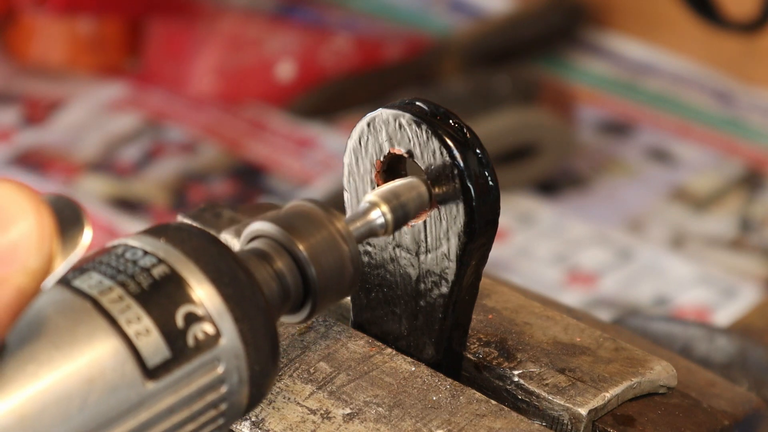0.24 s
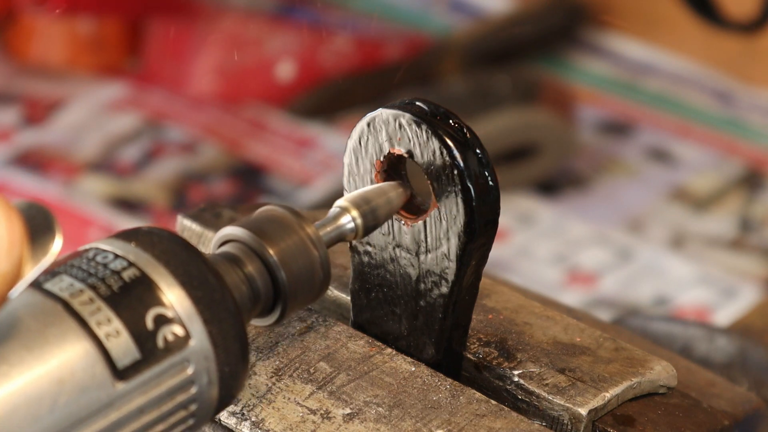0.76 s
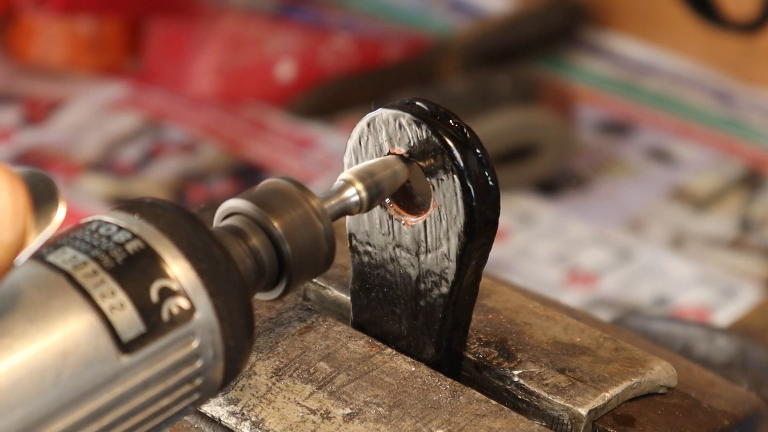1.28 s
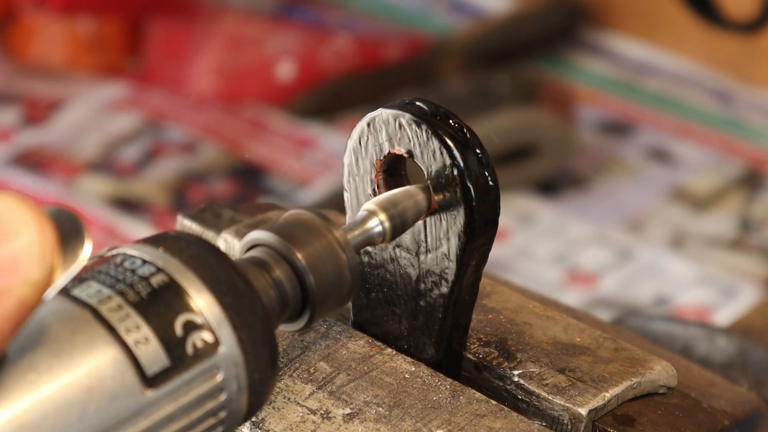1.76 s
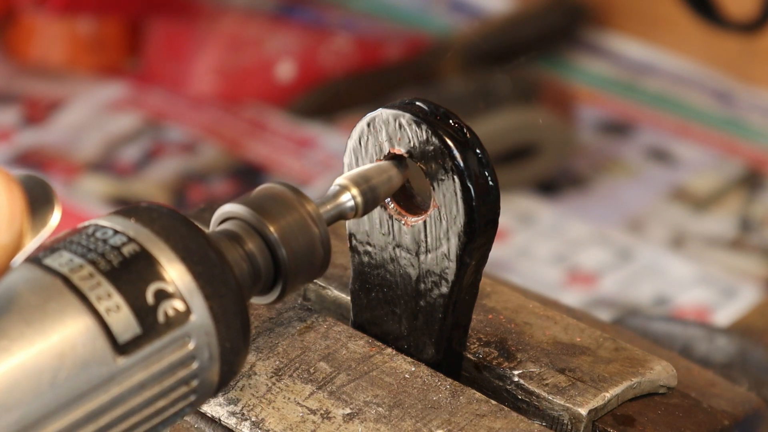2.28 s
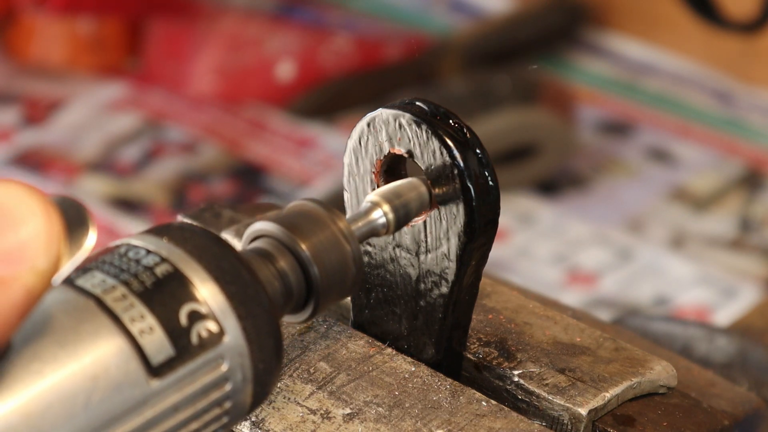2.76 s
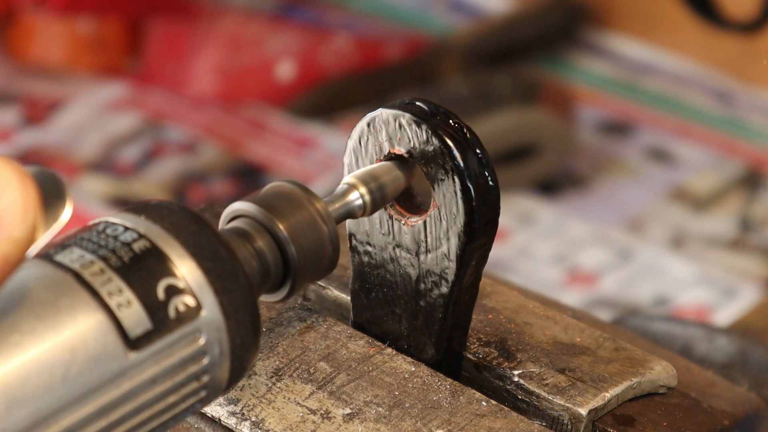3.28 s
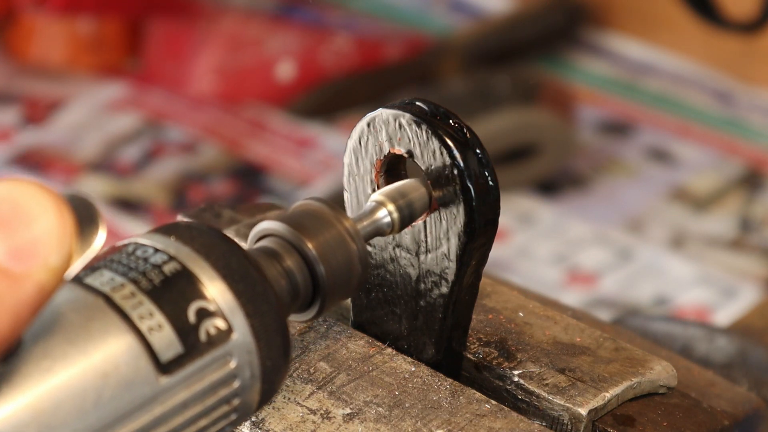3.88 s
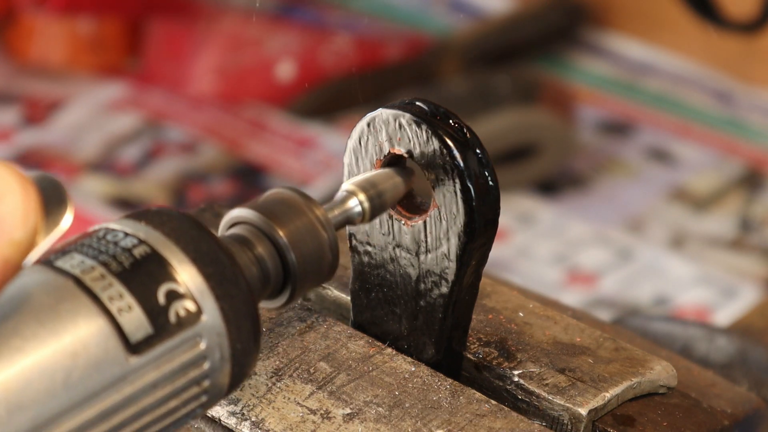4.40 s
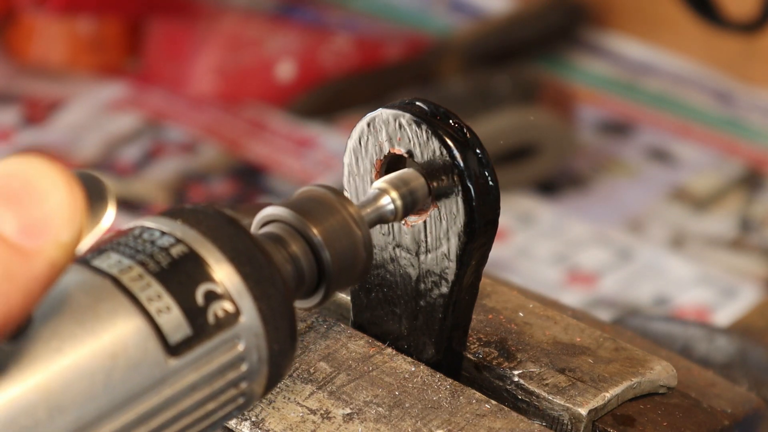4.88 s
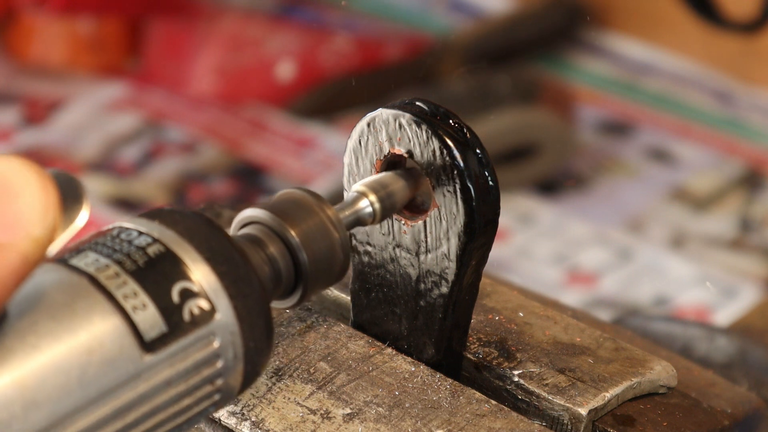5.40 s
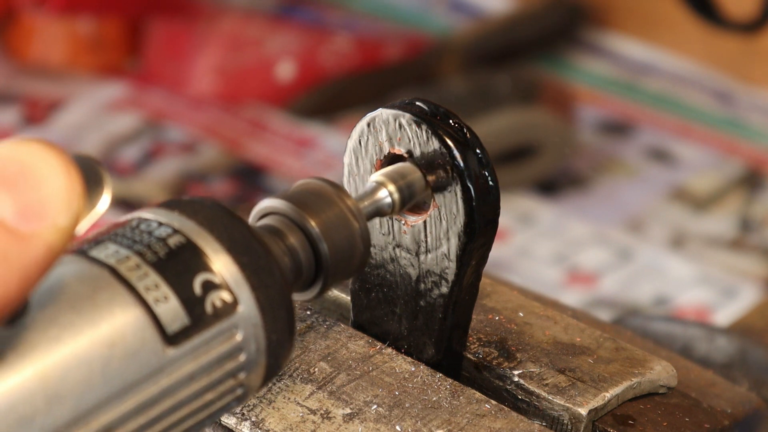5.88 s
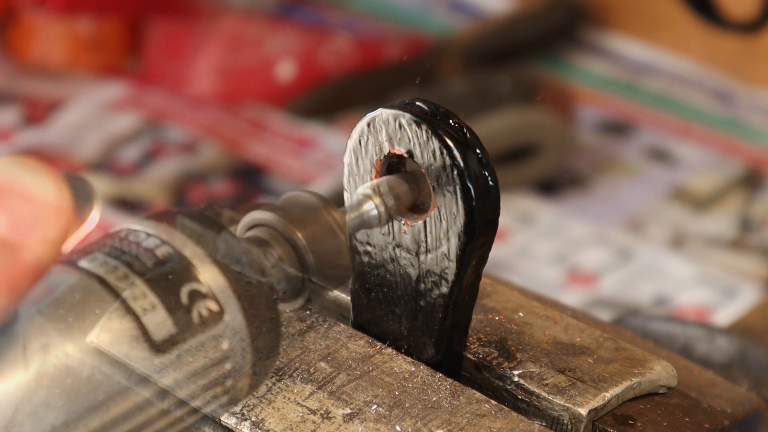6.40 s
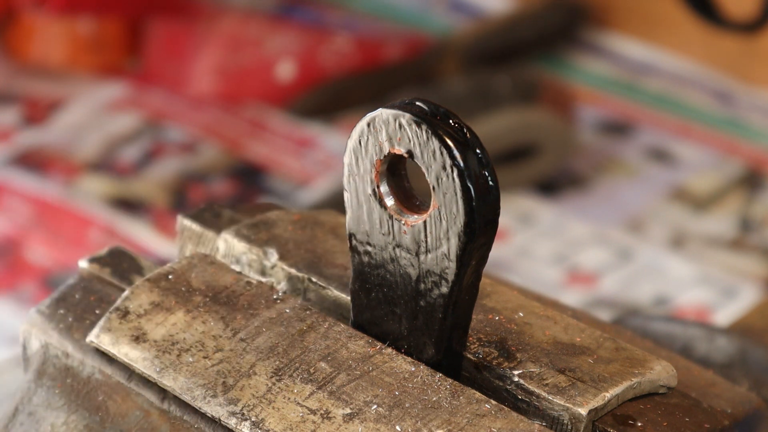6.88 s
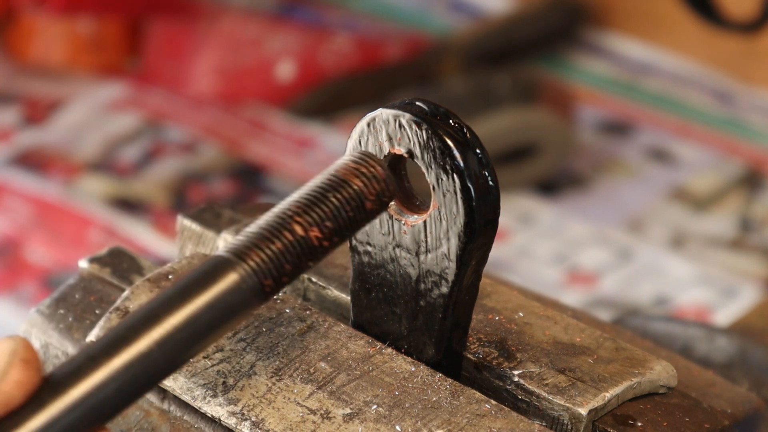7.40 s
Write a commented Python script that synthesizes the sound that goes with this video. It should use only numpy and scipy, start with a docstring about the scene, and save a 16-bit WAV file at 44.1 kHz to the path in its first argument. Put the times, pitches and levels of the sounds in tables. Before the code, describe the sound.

An electric die grinder whines and rasps inside a steel hole, pitch sagging under load and racing up, then fades to faint room noise.

```python
"""Small workshop, close by: an electric die grinder widens a hole in a steel part held in a vice.
The motor whine (gliding sines) sinks under the bite and races when eased, dipping in reflection nulls.
Shaft-locked sines buzz, knock and whistle; noise bunched by the rotation scrapes, rings, rasps and hisses.
Loud revs are turned down by a gain control. The sound fades, slows and drops in pitch at the end, and is
cut off quickly to faint room noise."""
import sys
import numpy as np
from scipy import signal
from scipy.fft import rfft, irfft, next_fast_len
from scipy.io import wavfile
from scipy.ndimage import uniform_filter1d

SR = 44100
rng = np.random.default_rng(int(sys.argv[2]) if len(sys.argv) > 2 else 0)


def log_audio(samples):
    """Write samples as a 16-bit WAV file to the path given in sys.argv[1]."""
    # one column per channel
    frames = np.atleast_2d(samples).T
    # limit to full scale, then quantise
    limited = np.clip(frames, -1, 1)
    pcm = np.round(limited * 32767).astype(np.int16)
    wavfile.write(sys.argv[1], SR, pcm)


N = 337365
TIME = np.arange(N) / SR
BEATS_PER_TURN = 4  # whine cycles per shaft turn
REFERENCE_HZ = 500


def undb(db):
    """Decibels to gain."""
    return 10 ** (np.asarray(db) / 20)


def unit(x):
    """Scale to rms 1."""
    return x / np.sqrt(np.mean(x ** 2))


def curves(table):
    """Interpolate each column after t/s to one value per sample."""
    t_s, *columns = np.transpose(table)
    return [np.interp(TIME, t_s, column) for column in columns]


def colour(x, points):
    """Filter by a spectrum of f/Hz, level/dB points with both ends rolled off; rms 1."""
    f_points, db_points = np.transpose(points)
    size = next_fast_len(N)
    f = np.maximum(np.fft.rfftfreq(size, 1 / SR), 1)
    ends = np.minimum(f / f_points[0], 1) ** 2 * np.minimum(f_points[-1] / f, 1) ** 4
    gain = undb(np.interp(np.log(f), np.log(f_points), db_points))
    return unit(irfft(rfft(x, size) * ends * gain, size)[:N])


def resonate(x, modes):
    """Sum parallel resonances, each filtered twice for steep skirts; rms 1."""
    out = 0
    for f_hz, width_hz, db in modes:
        b, a = signal.iirpeak(f_hz, f_hz / width_hz, fs=SR)
        once = signal.lfilter(b, a, x)
        out = out + undb(db) * signal.lfilter(b, a, once)
    return unit(out)


def walk(rate_hz):
    """Random curve, linear between rate_hz new values a second; rms 1."""
    knots = rng.standard_normal(8192)
    return unit(np.interp(TIME * rate_hz, np.arange(len(knots)), knots))


def sine(phase):
    """Sine of rms 1 from a phase in cycles, with a random start."""
    return np.sqrt(2) * np.sin(2 * np.pi * (phase + rng.random()))


def octaves(hz):
    """Motor speed above the reference, in octaves."""
    return np.log2(hz / REFERENCE_HZ)


# motor speed as whine pitch, before smoothing: t/s, f/Hz
SPEED_CURVE = [(0.01, 512.2), (0.46, 491.7), (0.59, 521), (0.82, 548.5), (0.95, 552.8), (1.09, 545),
               (1.27, 511.7), (1.49, 496), (1.85, 516.3), (1.92, 547), (1.99, 611), (2.03, 627),
               (2.19, 606.6), (2.33, 526), (2.55, 481), (2.74, 481.7), (2.87, 499), (3.0, 622), (3.14, 706),
               (3.41, 509.5), (3.5, 474.2), (3.89, 487.9), (4.05, 545.5), (4.11, 558), (4.25, 579),
               (4.55, 526), (4.62, 502), (4.74, 483.3), (5.06, 486.5), (5.09, 511.6), (5.22, 711.2),
               (5.32, 745), (5.38, 709), (5.49, 536.5), (5.57, 489), (5.76, 466.3), (6.25, 474.8),
               (6.51, 516.8), (6.7, 478.7), (6.74, 483.6)]
SLOWDOWN_S, SLOWDOWN_TAU_S = 6.75, .098


def speed():
    """Whine pitch/Hz: swings with the hand, wavers, and at the end drops exponentially to 1/e^2."""
    driven = uniform_filter1d(curves(SPEED_CURVE)[0], size=1400)
    driven = driven * (1 + .0018 * walk(40))
    slowing_s = np.clip(TIME - SLOWDOWN_S, 0, 2 * SLOWDOWN_TAU_S)
    return driven * np.exp(-slowing_s / SLOWDOWN_TAU_S)


# clean partials of the whine: multiple of f, level at reference pitch/dB, rise/(dB/octave)
WHINE_PARTIALS = [(1.0, -22.5, 15.5), (2.0, -24.5, 15), (3.0, -29, 3)]
# where nearby reflections cancel the whine: f/Hz, half width/Hz, depth/dB
REFLECTION_NULLS = [(528.6, 17.3, 14.5), (676, 17, 19), (729, 43, 6.5), (935, 8, 5), (966.6, 7.8, 11.5),
                    (1029, 23.3, 10), (1149, 40.4, 13.5), (1262, 20, 14), (1504, 43, 9), (1586, 25, 10.5),
                    (1726, 55, 11), (1880, 18, 14), (2040, 55, 26.5)]
# below the first, partials radiate poorly; below the second, the drive stops weakening
WHINE_LOW_HZ, WHINE_FULL_HZ = 432, 468


def whine(hz, phase, flutter_db, sway_db):
    """Three clean partials grow with speed and dip as they glide through reflection nulls."""
    out = 0
    drive = octaves(np.maximum(hz, WHINE_FULL_HZ))
    for k, db, rise in WHINE_PARTIALS:
        f = k * hz
        dips_db = sum(depth / (1 + ((f - centre) / half_width) ** 2)
                      for centre, half_width, depth in REFLECTION_NULLS)
        passed = uniform_filter1d(undb(-dips_db), size=900)  # a quick glide leaves no time for a deep dip
        level = undb(db + rise * drive + flutter_db * walk(70) + sway_db * walk(12))
        radiation = np.minimum(f / WHINE_LOW_HZ, 1) ** 4
        out = out + passed * level * radiation * sine(k * phase)
    return out


# upper partials before colouring: multiple of whine f, level/dB
BUZZ_PARTIALS = [(4, 7.5), (5, 0), (6, 0), (7, 0.5), (8, -2.5), (9, 0), (10, -2), (11, 0.5), (12, 0),
                 (13, -4.5), (14, 0), (15, -1.5), (17, -4.5)]
# radiation of the housing: f/Hz, level/dB
HOUSING_SPECTRUM = [(900, -22.5), (1850, -5.5), (2020, -19.5), (2200, -12), (2400, -6), (2770, 1.5),
                    (3000, -6.5), (3300, -2.5), (3700, -20)]
# singing of the bit: f/Hz, level/dB
SINGING_SPECTRUM = [(3200, -18), (3750, -8), (4200, -1), (4550, -1), (5000, 3.5), (5300, -1), (5900, 2.5),
                    (6350, -7), (6900, -5), (7600, -13.5), (8600, -20.5), (9500, -16.5), (10400, -25.5),
                    (11200, -4.5), (12200, -18)]
# cut force about its usual level, also used by knock and cutting: t/s, part scrape level/dB, bit ring level/dB
CUT_FORCE = [(0.0, -2.5, 0), (0.27, -6.5, -7.5), (0.67, -3.5, 2), (1.35, -4.5, -3), (1.45, 2, 0.5),
             (1.9, -1.5, 1.5), (2.0, 1.3, 5.5), (2.46, -5.5, 3), (2.55, 2, -1), (2.91, 0.5, -1.3),
             (2.96, -1.4, 6.5), (3.15, 6.5, 6.5), (3.41, -1, 3.5), (3.52, 0.5, 1), (3.83, 3, -1),
             (4.17, -3.5, 2), (4.21, 0.6, 6.5), (4.61, -3.5, 0.8), (4.89, 5.5, 2), (5.04, 2.8, -4),
             (5.15, 5.5, 8), (5.67, 4, 2), (5.8, -3.3, 7), (5.89, 5.5, 0.9), (6.12, 2, -3.5),
             (6.22, -2.6, -9), (6.51, 5, 9), (6.72, 3, -0.5)]


def buzz(hz, phase, shake, flutter_db, wobble, housing_db, singing_db,
         housing_db_per_octave, singing_db_per_octave):
    """Upper partials excite housing and bit, grow with speed and are phase-shaken by scraping."""
    scrape = unit(undb(curves(CUT_FORCE)[0]))
    phase = phase + shake * scrape * walk(260)
    partials = sum(undb(db + flutter_db * walk(14)) * sine(k * phase) for k, db in BUZZ_PARTIALS)
    # slightly untrue bit: side tones one shaft speed away
    partials = partials * (1 + wobble * sine(phase / BEATS_PER_TURN))
    housing_gain = undb(housing_db + housing_db_per_octave * octaves(hz))
    singing_gain = undb(singing_db + singing_db_per_octave * octaves(hz))
    return colour(partials, HOUSING_SPECTRUM) * housing_gain + colour(partials, SINGING_SPECTRUM) * singing_gain


# overtones of the knock: multiple of shaft f, level/dB
SHAFT_OVERTONES = [(2, -7.5), (3, -5), (5, -1.5), (6, -9), (7, 1.5), (9, -17), (10, -15.5), (11, 0.5),
                   (13, -10), (14, -8.5), (15, -6.5), (18, 2.5), (19, 3.5), (21, 7.5), (22, 1.5),
                   (23, -4.5), (25, -3.5)]
BITE_HZ, BITE_WIDTH_HZ = 538, 12  # the bit presses hard when the whine is dragged below BITE_HZ


def knock(hz, phase, light_db, pressed_db, overtone_db, uneven_db):
    """Shaft-rate sine swells under load; its overtones fill the gaps in the whine."""
    turns = phase / BEATS_PER_TURN
    overtones = sum(undb(db + uneven_db * walk(25)) * sine(k * turns) for k, db in SHAFT_OVERTONES)
    load = .5 + .5 * np.tanh((BITE_HZ - hz) / BITE_WIDTH_HZ)
    pressing = undb(light_db + (pressed_db - light_db + 1.3 * curves(CUT_FORCE)[0]) * load)
    return sine(turns) * pressing + overtones * undb(overtone_db) * unit(pressing ** 0.17)


RUNOUT = 0.18  # the bit cuts harder once a turn


def bunched_noise(phase, bite, jolt_db, grain_db, burst_db):
    """Noise bunched once a whine cycle and once a turn, in irregular jolts and longer bursts."""
    contact = bite * np.cos(2 * np.pi * phase) + RUNOUT * np.cos(2 * np.pi * phase / BEATS_PER_TURN)
    force = np.exp(contact) * undb(jolt_db * walk(230) + burst_db * walk(45))
    return force * undb(grain_db * walk(1000)) * rng.standard_normal(N)


# scrape of the clamped part: f/Hz, level/dB
PART_SPECTRUM = [(300, -16), (450, -5.5), (800, -15.5), (1150, -11), (1400, -2), (1700, 1), (1950, -6),
                 (2200, -2.5), (2500, -5), (3500, -37)]
# resonances of bit and collet: f/Hz, width of one pass/Hz, level/dB
BIT_RESONANCES = [(2475, 210, -4), (2639, 110, 4), (2774, 21, 7.5), (2830, 220, -3), (3143, 110, -2)]
# rasp of the chips: f/Hz, level/dB
CHIP_SPECTRUM = [(2400, -21), (3000, -14.5), (3350, 2.5), (3750, -1.5), (4250, 3.5), (5200, -2.5),
                 (5850, 3), (6350, -7.5), (7000, -4), (7800, -6), (8600, -17), (10000, -17), (15000, -30)]
# cooling air: f/Hz, level/dB
AIR_SPECTRUM = [(7000, -26.5), (9300, -15.5), (10300, -13), (10900, -4), (11300, 1.5), (11900, -4),
                (12800, -2.5), (13700, -9.5), (15500, -14)]


def cutting(phase, scrape_db, ring_db, rasp_db, air_db):
    """Fractures of the steel shake the part, ring the bit and rasp; air hisses from the vents."""
    scrape, ring = curves(CUT_FORCE)
    rasp = 0.14 * scrape + 0.14 * ring
    fractures = bunched_noise(phase, bite=0.46, jolt_db=3, grain_db=1.8, burst_db=2.2)
    chatter = bunched_noise(phase, bite=0.55, jolt_db=3.5, grain_db=0.9, burst_db=1.0)
    dust = bunched_noise(phase, bite=0.6, jolt_db=0.5, grain_db=-0.2, burst_db=0.8)
    draught = bunched_noise(phase, bite=0.37, jolt_db=-1.0, grain_db=0.0, burst_db=0.6)
    return (colour(fractures, PART_SPECTRUM) * undb(scrape + scrape_db)
            + resonate(chatter, BIT_RESONANCES) * undb(ring + ring_db)
            + colour(dust + 0.27 * fractures, CHIP_SPECTRUM) * undb(rasp + rasp_db)
            + colour(draught, AIR_SPECTRUM) * undb(air_db))


# whistle of the fan blades before colouring: multiple of whine f, level/dB
BLADE_PARTIALS = [(17, -7.5), (18, 2), (19, 1), (20, -9.5), (21, 2), (22, -3.5), (24, -7), (26, -8.5)]
# resonance of the vents: f/Hz, level/dB
VENT_SPECTRUM = [(8500, -33.5), (9500, -12.5), (10200, -20), (10700, -2), (11250, 3.5), (11700, -6.5),
                 (12700, -9), (13600, -15.5)]


def whistle(phase, gain_db, shake):
    """High fan partials light up as they glide through the vent resonance."""
    phase = phase + shake * walk(200)
    partials = sum(undb(db) * sine(k * phase) for k, db in BLADE_PARTIALS)
    return colour(partials, VENT_SPECTRUM) * undb(gain_db)


# dull noise of the motor body: f/Hz, level/dB
BODY_SPECTRUM = [(35, -21), (65, -3.5), (88, 3), (130, -6), (200, -11.5), (330, -11), (440, 6), (600, -2.5),
                 (800, -2.5), (1150, 2), (1500, -11), (2200, -13.5)]


def motor_body(gain_db):
    """Dull steady noise of the motor body: filtered white noise."""
    return undb(gain_db) * colour(rng.standard_normal(N), BODY_SPECTRUM)


# quiet workshop: f/Hz, level/dB
ROOM_SPECTRUM = [(18, -30.5), (30, -1.5), (48, -6.5), (69, -7), (92, -2.5), (139, -5.5), (404, -15.5),
                 (935, -0.5), (1300, -10.5), (1530, -16.5), (2770, -31.5), (4000, -33), (5200, -63.5),
                 (8800, -120)]


def room_noise(gain_db):
    """Faint steady noise of the quiet workshop: filtered white noise."""
    return undb(gain_db) * colour(rng.standard_normal(N), ROOM_SPECTRUM)


def after_ring(x, f_hz, t60_s, gain_db):
    """The bit rings on faintly at one resonance; its width sets the decay."""
    width_hz = np.log(1000) / (np.pi * t60_s)
    b, a = signal.iirpeak(f_hz, f_hz / width_hz, fs=SR)
    return undb(gain_db) * signal.lfilter(b, a, x)


def workshop(x, wet_db, t60_s):
    """Short diffuse echo from bench and walls: convolution with decaying noise."""
    t = TIME[:SR // 2]
    decay = np.exp(-np.log(1000) * t / t60_s)
    tail = rng.standard_normal(len(t)) * decay * (t > .004)
    return x + undb(wet_db) * signal.fftconvolve(x, tail / np.linalg.norm(tail))[:N]


FADE_S, FADE_DB_PER_S = 6.17, 16  # the sound fades
RATTLE_FADE_DB_PER_S = 3  # extra for rattle and hiss
CUTOFF_S, CUTOFF_DB_PER_S = 6.8, 702  # the sound is cut off quickly


def scene():
    """One shaft drives the tool's layers; room noise lies beneath."""
    hz = speed()
    phase = np.cumsum(hz) / SR  # cycles
    hum = whine(hz, phase, flutter_db=0.54, sway_db=0.39)
    rattle = buzz(hz, phase, shake=0.002, flutter_db=2.5, wobble=0.22, housing_db=-41.0, singing_db=-43,
                  housing_db_per_octave=13.5, singing_db_per_octave=23.5)
    hum = hum + knock(hz, phase, light_db=-64.5, pressed_db=-58.0, overtone_db=-56.0, uneven_db=1.5)
    rattle = rattle + cutting(phase, scrape_db=-42.5, ring_db=-40.5, rasp_db=-40.5, air_db=-43.0)
    rattle = rattle + whistle(phase, gain_db=-51, shake=.002)
    rattle = rattle + motor_body(gain_db=-51.5)
    fading_s = np.maximum(TIME - FADE_S, 0)
    cutoff_s = np.maximum(TIME - CUTOFF_S, 0)
    fade = undb(-FADE_DB_PER_S * fading_s - CUTOFF_DB_PER_S * cutoff_s)
    rattle = fade * rattle * undb(-RATTLE_FADE_DB_PER_S * fading_s)
    rattle = rattle + after_ring(rattle, f_hz=2720, t60_s=0.39, gain_db=-8.5)
    tool = workshop(rattle, wet_db=-9.5, t60_s=0.14) + workshop(fade * hum, wet_db=-13.5, t60_s=0.24)
    return (tool + room_noise(gain_db=-74.5))[None]


LIMIT_DB, RECOVERY_DB_PER_S = -20.5, 3.5
TURN_DOWN_S = .035  # reaction time constant


def gain_control(x):
    """Turn down quickly above the limit, recover slowly: the hiss ducks after each loud rev."""
    level_db = 10 * np.log10(uniform_filter1d(x[0] ** 2, size=600) + 1e-12)
    recovery_db = RECOVERY_DB_PER_S * TIME
    excess_db = np.maximum(level_db - LIMIT_DB, 0)
    held_db = np.maximum.accumulate(excess_db + recovery_db) - recovery_db
    follow = 1 / (TURN_DOWN_S * SR)
    reduction_db = signal.lfilter([follow], [1, follow - 1], held_db)
    return x * undb(-reduction_db)


TOP_HZ = 15750


def record(dry):
    """Hold down the loud revs, then cut steeply above TOP_HZ."""
    low_pass = signal.ellip(10, .2, 80, TOP_HZ, fs=SR, output="sos")
    return signal.sosfilt(low_pass, gain_control(dry))


dry = scene()
out = record(dry)
log_audio(out)
```